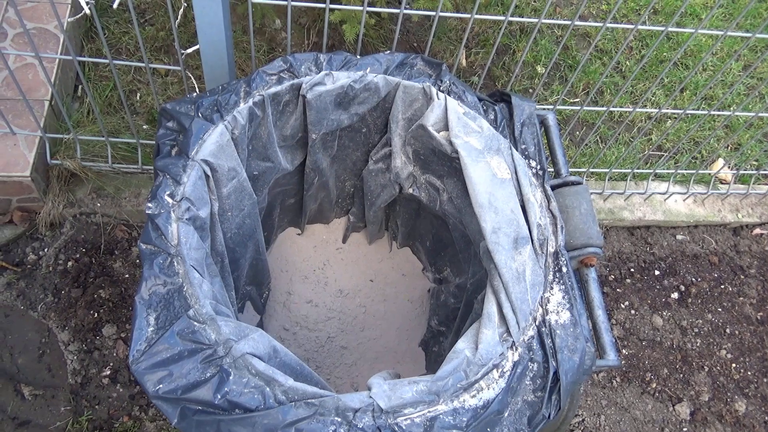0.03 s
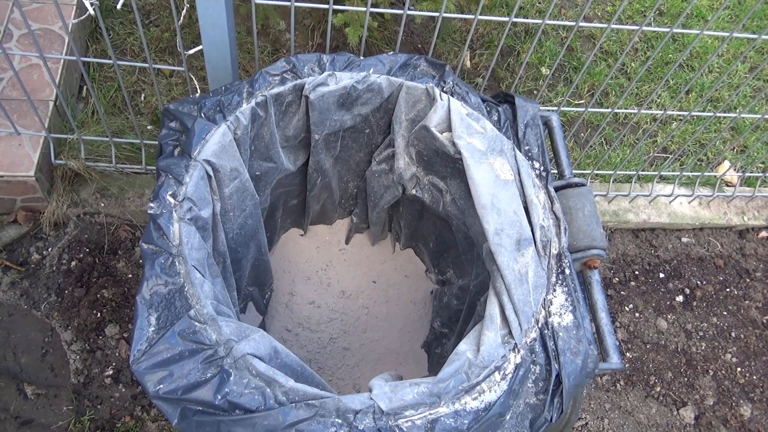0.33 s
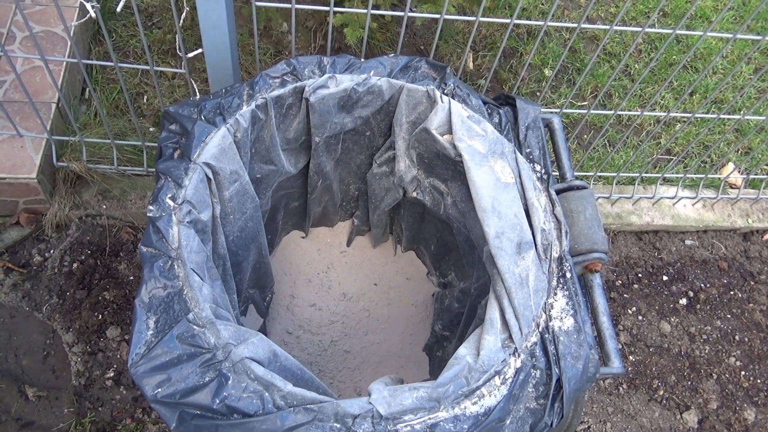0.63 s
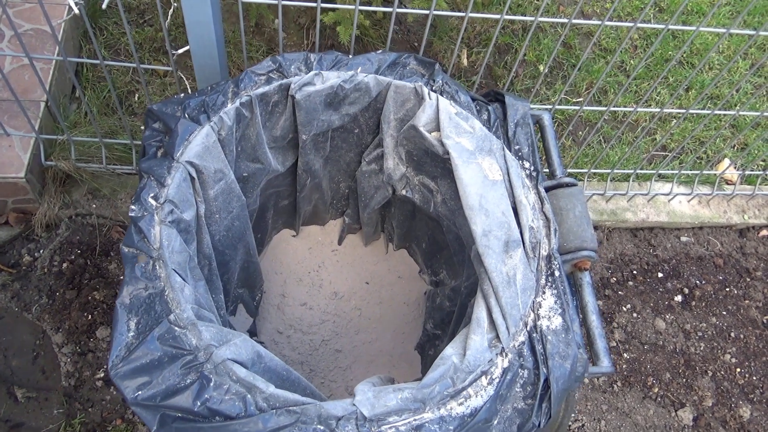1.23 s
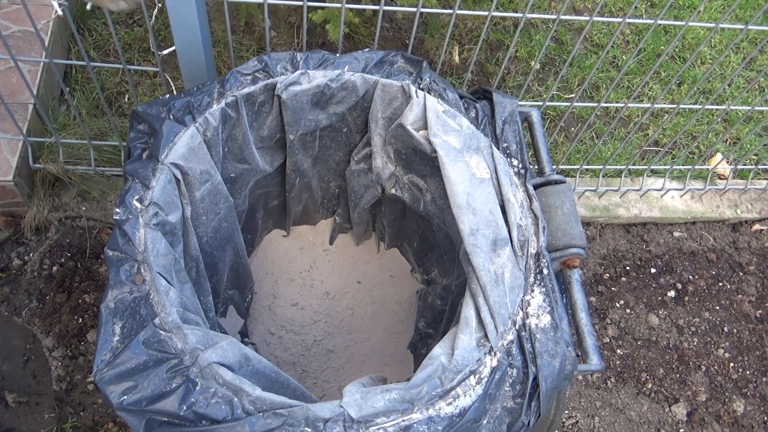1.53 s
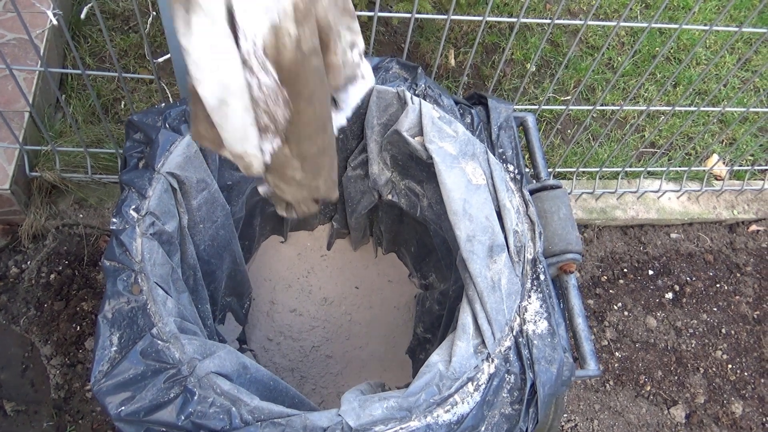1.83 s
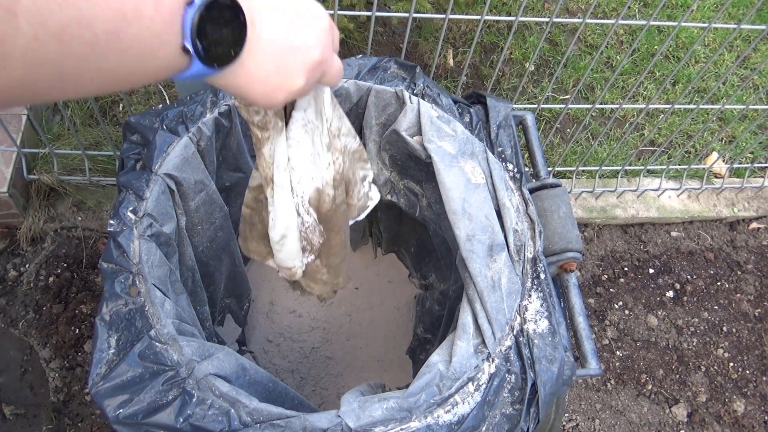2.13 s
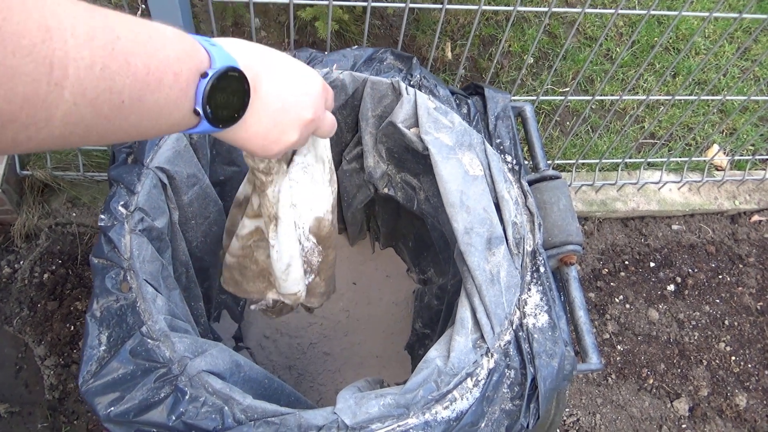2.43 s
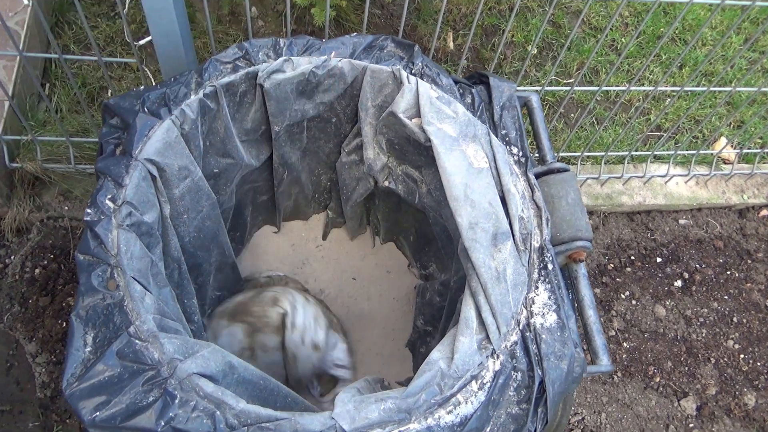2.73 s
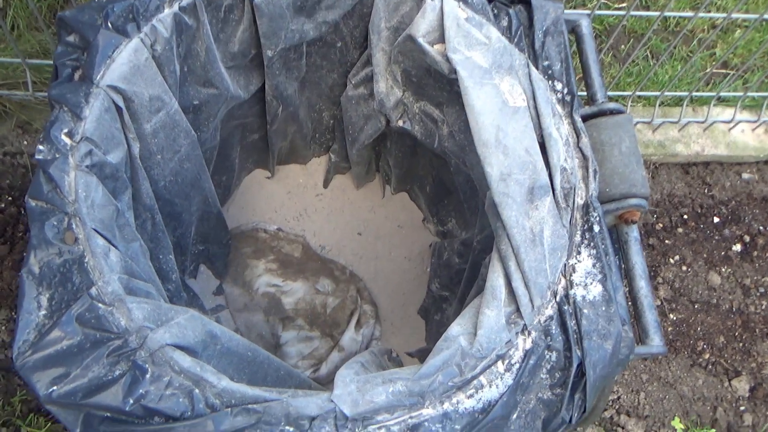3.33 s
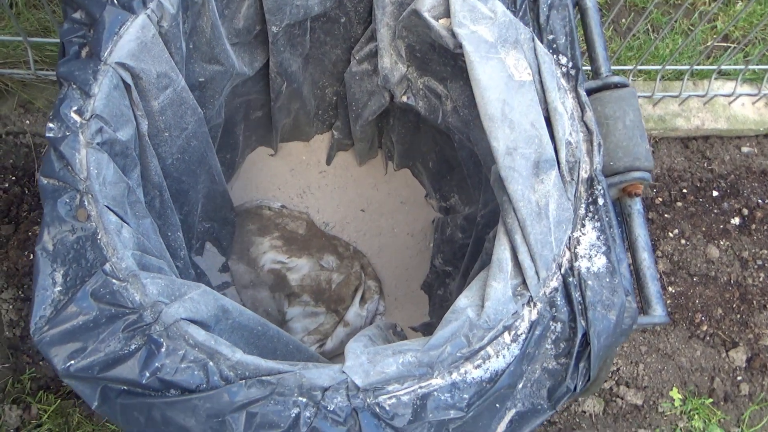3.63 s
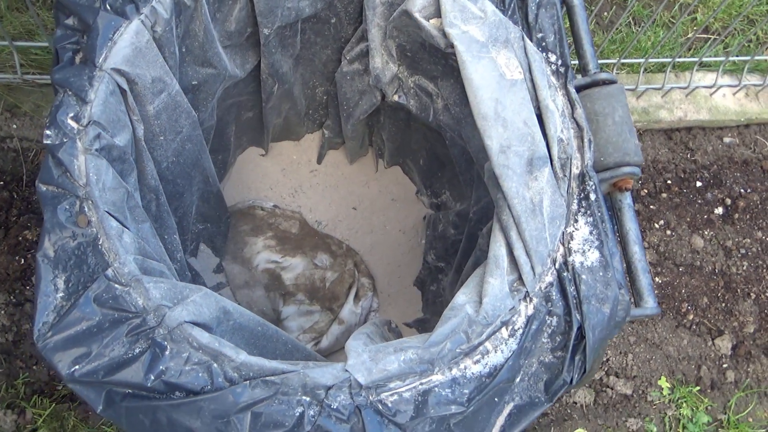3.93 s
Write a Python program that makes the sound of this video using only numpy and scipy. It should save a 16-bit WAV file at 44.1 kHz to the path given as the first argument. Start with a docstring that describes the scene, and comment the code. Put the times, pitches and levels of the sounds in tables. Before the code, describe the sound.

A wet cloth splats into muddy water as wind buffets the microphone.

```python
"""A wet cloth is carried to a lined bin outdoors, over faint background noise and a hum.
From the start, clothing swishes and the grip creaks, clicks and rasps close to the microphone.
Just before 1 s, gusts begin to buffet the microphone, and soon after a plastic part snaps.
At about 2.6 s the cloth drops into muddy water with one short splat of spray, slosh and trapped air.
The gusts, swishes and clicks carry on to the end."""
import sys
import numpy as np
from scipy import signal
from scipy.fft import rfft, irfft
from scipy.io import wavfile
from scipy.ndimage import uniform_filter1d

SR = 44100
rng = np.random.default_rng(int(sys.argv[2]) if len(sys.argv) > 2 else 0)


def output_pcm(signal):
    """Save a mono or channel-first signal as 16-bit PCM at the path in sys.argv[1].

    Samples are clipped to [-1, 1] before scaling.
    """
    pcm = np.clip(np.atleast_2d(signal).T, -1, 1) * 32767
    wavfile.write(sys.argv[1], SR, np.round(pcm).astype(np.int16))


N = 176400  # 4 seconds
T, FREQS = np.arange(N) / SR, np.fft.rfftfreq(N, 1 / SR)
# Likeness of left and right: 1 is the same, 0 is unrelated, -1 is opposite.
WATER_LIKENESS, GRIP_LIKENESS = 0.97, 0.87
CLICK_LEFT_DB = 4

# The tone of sloshing muddy water. Each row: frequency in Hz, level in dB.
SLOSH_TONE = [(200, -4), (500, 3.5), (900, 2), (1500, 3), (2500, -2.5), (4500, -3), (10000, -65)]
# The tone that clicks and rasps share. Each row: frequency in Hz, level in dB.
CLICK_TONE = [(250, -30), (900, 10), (3000, 4), (5000, 4), (7000, 1.5), (9500, 5.5), (12000, -6),
              (15500, -13)]


def amp(db):
    """Turns decibels into a number to multiply a sound by."""
    return 10 ** (np.asarray(db) / 20)


def unit(x):
    """Scales a sound so that its average power is 1."""
    return x / np.sqrt(np.mean(x ** 2) + 1e-20)


def steady(x, samples):
    """Evens out the loudness over the given number of samples."""
    power = uniform_filter1d((x ** 2).mean(0), size=samples)
    return x / np.sqrt(abs(power) + 1e-12)


def over_frequency(points):
    """Joins rows of frequency and value into a curve over all frequencies."""
    hz, value = np.transpose(points)
    return np.interp(np.log(FREQS + 1), np.log(hz), value)


def over_time(rows, column=1):
    """Joins rows of seconds and dB into a volume curve for the whole scene."""
    rows = np.array(rows)
    return amp(np.interp(T, rows[:, 0], rows[:, column]))


def add(mix, start, sound):
    """Mixes a stereo sound in at a start time in seconds."""
    part = mix[:, max(round(start * SR), 0):][:, :sound.shape[1]]
    part += sound[:, :part.shape[1]]


def pan(left_db):
    """Left and right volumes, with the left louder by left_db."""
    return amp([[left_db / 2], [-left_db / 2]])


def colour(x, tone):
    """Filters a sound to follow a tone table; white noise would keep its power."""
    log_gain = np.log(amp(over_frequency(tone)))
    # This phase makes the filter ring after each hit, not before it.
    phase = -signal.hilbert(np.r_[log_gain, log_gain[-2:0:-1]]).imag[:len(FREQS)]
    return irfft(rfft(x) * unit(np.exp(log_gain)) * np.exp(1j * phase), N)


def pair(x, likeness):
    """Blends two unrelated channels into a left and a right with the given likeness."""
    mid, side = rfft(x)
    likeness = np.clip(likeness, -1, 1)
    mid, side = mid * np.sqrt(1 + likeness), side * np.sqrt(1 - likeness)
    return irfft(np.array([mid + side, mid - side]), N)


def noise(tone, likeness):
    """Smooth stereo noise with the given tone."""
    return unit(colour(pair(rng.standard_normal((2, N)), likeness), tone))


def grains(per_second, spread_db, likeness):
    """Tiny random impacts in stereo, a few of them large."""
    size = amp(spread_db * np.minimum(rng.exponential(1, (2, N)), 4))
    sign = rng.choice([-1, 1], (2, N))
    hits = rng.random((2, N)) < per_second / SR
    return pair(size * sign * hits, likeness)


def crackle(tone, likeness, per_second, spread_db):
    """Tiny random impacts with the given tone."""
    return unit(colour(grains(per_second, spread_db, likeness), tone))


def flutter(swell_s=0.005, depth_db=1.5):
    """Quick uneven swelling, as cloth catches and lets go."""
    window = np.hanning(round(2 * swell_s * SR))
    wobble = signal.fftconvolve(rng.standard_normal(N), window, "same")
    return amp(depth_db * unit(wobble))


def outdoors(hum_hz=607, hum_width_hz=54, air_db=-47.5):
    """Steady distant noise, and a faint hum that swells and fades."""
    # The tone of the distant noise. Each row: frequency in Hz, level in dB.
    air_tone = [(20, -10), (50, 8), (120, -1), (300, -2.5), (480, -3), (620, -7.5), (800, -3), (1000, -4.5),
                (1400, -12.5), (2500, -20.5), (5000, -24), (9000, -24.5), (15500, -34)]
    # How alike it is on both sides. Each row: frequency in Hz, likeness.
    air_likeness = [(100, 0.97), (600, 1), (1200, 0.64), (3000, 0.18), (9000, 0.99)]
    # The swelling of the hum. Each row: time in seconds, level in dB.
    hum_levels = [(0, -86), (.3, -53), (.45, -58), (.485, -40), (.52, -54), (.68, -50.5), (.95, -52.5),
                  (1.6, -57.5), (4, -51.5)]
    hum = irfft(rfft(rng.standard_normal(N)) / (1 + ((FREQS - hum_hz) / hum_width_hz) ** 2), N)
    air = amp(air_db) * noise(air_tone, over_frequency(air_likeness))
    return air + over_time(hum_levels) * steady(hum[None], samples=900)


def clothing():
    """Strokes of fabric swell and fade, with crinkles in them and a high fizz in the fast ones."""
    # Strokes near the microphone. Each row: peak time, rise and fall in seconds, strength in dB,
    # fizz in dB compared with the stroke.
    strokes = [(.04, 0.028, 0.044, -61, 2), (.3, 0.1, 0.042, -48, -2), (.66, 0.15, 0.14, -49.5, -6),
               (.785, 0.063, 0.054, -46, 1.5), (.93, 0.11, 0.072, -46.5, -8),
               (1.19, 0.053, 0.055, -46.5, -20), (1.45, 0.17, 0.11, -54, -18), (2.14, 0.1, 0.085, -59, -20),
               (2.9, 0.079, 0.082, -59, -20), (3.17, 0.083, .13, -44, -2), (3.69, 0.072, 0.12, -45.5, 1),
               (3.95, 0.068, 0.17, -46, -5)]
    # The tones of rubbing, crinkling and fizzing fabric. Each row: frequency in Hz, level in dB.
    rub_tone = [(300, -9), (900, -5), (2000, -2), (3500, -3), (6500, -1.5), (10000, -5), (12000, -22),
                (15500, -43)]
    crinkle_tone = [(600, -35), (2500, -0.5), (5000, 8.5), (9500, 3), (12000, -7), (15500, -9)]
    fizz_tone = [(3000, -5), (7000, 5), (10000, 7.5), (13000, 2.5), (15500, -5.5)]
    # How alike the fabric sounds on both sides. Each row: frequency in Hz, likeness.
    fabric_likeness = [(800, 1), (2000, 0.26), (4000, 0.51), (7500, 0.33), (10000, 0.93), (15000, 1)]
    power, fizz_power = np.zeros((2, N))
    for peak, rise, fall, db, fizz_db in strokes:
        from_peak = np.maximum((peak - T) / rise, (T - peak) / fall)
        stroke = amp(db) * np.exp(-.5 * from_peak ** 1.52)
        power += stroke ** 2
        fizz_power += (amp(fizz_db) * stroke) ** 2
    likeness = over_frequency(fabric_likeness)
    crinkle = amp(-4) * crackle(crinkle_tone, likeness, per_second=230, spread_db=6)
    rub = amp(1) * noise(rub_tone, likeness)
    fizz = amp(-1.5) * noise(fizz_tone, likeness=1)
    return pan(left_db=2) * (np.sqrt(power) * (rub + crinkle) + np.sqrt(fizz_power) * fizz)


def grip_creak():
    """The grip creaks finely with a stream of tiny ticks."""
    # How strongly the grip creaks. Each row: time in seconds, level in dB.
    creak_levels = [(0, -54), (.12, -50.5), (.22, -43.5), (.36, -54.5), (.88, -50.5), (1.1, -58),
                    (1.18, -47), (1.3, -67), (1.8, -66.5), (2.03, -56.5), (2.13, -45.5), (2.3, -59),
                    (3.035, -59), (3.055, -46), (3.35, -43.5), (3.46, -46), (3.6, -45.5), (3.86, -49),
                    (4, -43.5)]
    # The tone of the creak. Each row: frequency in Hz, level in dB.
    creak_tone = [(250, -24.5), (600, 6), (1000, 7), (1600, 4), (2800, 0), (4500, -5.5), (9000, -23.5),
                  (15000, -47)]
    creak = crackle(creak_tone, GRIP_LIKENESS, per_second=2000, spread_db=3.5)
    return pan(left_db=8) * over_time(creak_levels) * creak


def clicks(slip_s=0.01, crack_s=0.0006, ring_s=0.003, echo_s=0.018):
    """A slip builds to a crack, rings briefly at its own pitch and bounces off nearby surfaces."""
    # Sharp clicks of handling and drips. Each row: time in seconds, strength in dB, pitch in Hz.
    click_events = [(0.031, -30.5, 5900), (0.061, -28, 5100), (.135, -34, 1300), (.235, -31, 1500),
                    (0.412, -32, 1600), (0.634, -28, 5700), (1.029, -34.5, 2000), (1.112, -36, 3970),
                    (1.1559, -13, 3400), (1.164, -22, 3200), (1.167, -27, 1110), (1.201, -28, 9000),
                    (1.385, -31, 6500), (1.427, -33.5, 6000), (1.462, -33, 6500), (1.480, -32.5, 4030),
                    (1.585, -37, 5100), (1.642, -31, 10500), (1.938, -36, 3000), (2.939, -28.5, 2730),
                    (3.077, -22.5, 5560), (3.146, -24.5, 10000), (3.385, -18, 4440), (3.519, -28, 2290),
                    (3.547, -26, 2530), (3.593, -24, 3320), (3.608, -26.5, 3500), (3.875, -29, 4000),
                    (3.955, -32, 4500), (3.973, -24.5, 3800)]
    t = np.arange(-SR // 100, SR // 10) / SR  # the crack comes at t = 0
    after = np.maximum(t, 0)
    slip_then_ring = np.where(t < 0, amp(-34) * np.exp(-abs(t) / slip_s),
                              amp(-12) * np.exp(-after / ring_s))
    echo_fade = amp(-14.5) * (t >= 0) * np.exp(-after / echo_s)
    out = np.zeros((2, N))
    for time, db, hz in click_events:
        hiss = rng.standard_normal((4, len(t)))
        centre_hiss, wide_hiss = hiss[1], hiss[2:]
        crack = hiss[0] * (t >= 0) * np.exp(-after / crack_s)
        crack *= np.sqrt(crack_s * SR / 8) / np.linalg.norm(crack)  # same energy each time
        ring = slip_then_ring * (centre_hiss + .5 * wide_hiss)
        click = crack + .5 * (ring + echo_fade * wide_hiss)
        b, a = signal.iirpeak(hz, Q=1.38, fs=SR)
        pitched = signal.lfilter(b, a, click) / np.sqrt(b[0])
        add(out, time + t[0], amp(db) * (pitched + amp(-2.5) * click))
    return amp(-1.5) * pan(CLICK_LEFT_DB) * colour(out, CLICK_TONE)


def rasps():
    """The grip or fabric drags: a dense run of tiny slips swells and dies within milliseconds."""
    # Short drags. Each row: start in seconds, rise in seconds, strength in dB, rough pitch in Hz.
    drags = [(0.1868, 0.00061, -33.5, 1600), (0.202, 0.0027, -41.5, 1610), (.220, 0.0035, -36.5, 1320),
             (1.154, 0.00066, -24.5, 5070), (1.348, 0.0034, -41, 3700), (2.328, 0.0067, -43, 6000),
             (3.046, 0.0027, -41, 1610), (3.257, 0.0022, -35.5, 8200), (3.2598, .002, -36, 2900),
             (3.392, 0.0042, -40, 4000), (3.4035, 0.0024, -32.5, 4930)]
    t = np.arange(SR // 20) / SR
    slips = grains(per_second=5400, spread_db=2, likeness=GRIP_LIKENESS)
    out = np.zeros((2, N))
    for start, rise, db, hz in drags:
        swell = t / rise * np.exp(1 - t / rise)
        run = swell * slips[:, round(start * SR):][:, :len(t)]
        rasp = signal.lfilter(*signal.iirpeak(hz, Q=1.27, fs=SR), run)
        add(out, start, amp(db) * unit(rasp) * np.sqrt(np.mean(swell ** 2)))
    return pan(left_db=6) * colour(out, CLICK_TONE)


def wind(strong_gust_db=-20):
    """Air swirls at the microphone's two openings; the rumble gets brighter as a gust grows."""
    # The strength of the gusts. Each row: time in seconds, level in dB.
    gust_levels = [(.87, -55.5), (.94, -26.5), (1.0, -40.5), (1.03, -26), (1.135, -20), (1.17, -30.5),
                   (1.215, -20), (1.26, -21), (1.305, -28.5), (1.335, -20.5), (1.43, -23.5), (1.59, -25.5),
                   (1.71, -41.5), (1.8, -32.5), (1.9, -27), (2.06, -25.5), (2.18, -32), (2.225, -49),
                   (2.32, -24.5), (2.38, -23), (2.47, -25), (2.66, -28), (2.72, -22.5), (2.85, -34.5),
                   (2.9, -21), (3.01, -31), (3.07, -27.5), (3.17, -37.5), (3.34, -17.5), (3.46, -32),
                   (3.59, -49.5), (3.68, -27), (3.74, -29), (3.78, -21.5), (3.88, -30.5), (4, -25.5)]
    # The tones of the rumble and of a strong gust's rush. Each row: frequency in Hz, level in dB.
    rumble_tone = [(15, -34), (30, -6.5), (70, -0.5), (130, 1), (230, -7.5), (350, -18), (600, -35),
                   (1200, -58), (3000, -105)]
    rush_tone = [(80, -27), (250, 7.5), (420, -8), (700, -14), (1200, -26.5), (2500, -54), (6000, -61)]
    # How alike the wind is at the two openings. Each row: frequency in Hz, likeness.
    wind_likeness = [(40, 0.81), (130, 0.61), (260, -0.13), (450, -0.42), (800, -1.1), (1600, -1)]
    likeness = over_frequency(wind_likeness)
    fade_in = np.clip((T - .8) / 0.034, 0, 1)
    gust = over_time(gust_levels) * fade_in
    rumble = amp(1) * gust * steady(noise(rumble_tone, likeness), samples=1500)
    rush = amp(-27) * (gust / amp(strong_gust_db)) ** 2.5 * noise(rush_tone, likeness)
    return rumble + rush


def buffets(bass_cut_hz=187):
    """Brief ragged bursts of wind hit the microphone during the gusts."""
    # Bursts of wind. Each row: peak time and half length in seconds, level in dB, treble cut in Hz.
    bursts = [(1.037, 0.0079, -22.5, 470), (1.085, 0.021, -21.5, 347), (1.228, 0.02, -15.5, 283),
              (1.273, 0.018, -22, 494), (1.379, 0.025, -23.5, 308), (2.063, 0.031, -34.5, 350),
              (2.371, 0.015, -27.5, 312), (2.519, 0.021, -21, 306), (2.718, 0.017, -30.5, 376),
              (2.907, 0.018, -29, 300), (3.061, 0.014, -27.5, 282), (3.333, 0.068, -23.5, 273),
              (3.337, 0.01, -25, 900), (3.692, 0.0065, -24.5, 400), (3.806, 0.016, -27, 380)]
    air = pair(rng.standard_normal((2, N)), likeness=-0.47)
    cut_bass = signal.butter(2, bass_cut_hz, "high", fs=SR, output="sos")
    out = np.zeros((2, N))
    for peak, half_length, db, hz in bursts:
        swell = np.exp(-((T - peak) / half_length) ** 2)
        dull_air = signal.sosfilt(signal.butter(3, hz, fs=SR, output="sos"), air)
        burst = swell * signal.sosfilt(cut_bass, dull_air)
        out += amp(db) * burst * np.sqrt(np.mean(swell ** 2) / np.mean(burst ** 2))
    return out


def snap(start_s=1.1553):
    """A stiff plastic part lets go at once and rings very briefly."""
    # The notes the plastic rings with. Each row: pitch in Hz, level in dB, fade time in seconds.
    notes = [(900, -27.5, 0.0034), (3120, -11.5, 0.0008), (5200, -20, 0.00059), (7800, -14, 0.00069)]
    t = np.maximum(T - start_s, 0)
    ring = sum(amp(db) * np.exp(-t / fade) * np.sin(2 * np.pi * hz * t) for hz, db, fade in notes)
    return pan(CLICK_LEFT_DB) * ring


def wind_thumps(lag_s=0.00029, width_cycles=0.5):
    """Large swirls of air thump one microphone opening just before the other."""
    # Single swirls. Each row: time in seconds, peak level in dB, pitch in Hz.
    swirls = [(1.218, -13.5, 190), (1.336, -23, 106), (2.372, -14.5, 163), (2.728, -12.5, 85),
              (2.901, -13.5, 90), (3.3416, -12, 880), (3.693, -14, 176)]
    t = np.arange(-SR // 50, SR // 50) / SR
    out = np.zeros((2, N))
    for (time, db, hz), side in zip(swirls, rng.choice([-1, 1], len(swirls))):
        cycles = (t + side * lag_s * np.array([[.5], [-.5]])) * hz
        swell = 1 / np.cosh(np.clip(cycles / width_cycles, -20, 20)) ** 2
        thump = swell * np.sin(2 * np.pi * cycles)
        add(out, time + t[0], amp(db) * thump / thump.max())
    return out


def splat():
    """The cloth hits the water: a bright burst of spray over a duller slosh."""
    # The first slap, the bulk of the cloth going in, then settling.
    # Each row: time in seconds, spray strength in dB, slosh strength in dB.
    splat_levels = [(2.638, -58, -66), (2.646, -40, -60), (2.666, -36, -38.5), (2.681, -33, -49),
                    (2.694, -31, -43.5), (2.727, -28, -38.5), (2.745, -31.5, -38.5), (2.759, -36.5, -38.5),
                    (2.775, -35, -50), (2.79, -40.5, -48), (2.84, -58, -56), (2.9, -55, -60)]
    # The tone of flying droplets. Each row: frequency in Hz, level in dB.
    spray_tone = [(500, -22), (1500, -16), (3300, -6.5), (4300, -2), (6000, -3), (8000, -1), (10000, -3.5),
                  (12000, -10), (15500, -25)]
    spray = amp(1) * crackle(spray_tone, WATER_LIKENESS, per_second=7000, spread_db=2)
    slosh = amp(3) * crackle(SLOSH_TONE, WATER_LIKENESS, per_second=2900, spread_db=2)
    spray *= over_time(splat_levels) * flutter()
    slosh *= over_time(splat_levels, column=2)
    fade_in_and_out = np.interp(T, [2.6, 2.63, 2.88, 2.98], [0, 1, 1, 0])
    return fade_in_and_out * (spray + slosh)


def fold_slaps(fade_s=0.0031, pitch_rise_per_s=15):
    """Each fold smacks the water and traps air, which rings at a rising pitch until mud damps it."""
    # Folds of cloth landing. Each row: start in seconds, level in dB, the air's first pitch in Hz.
    folds = [(2.644, -26, 330), (2.664, -34, 640), (2.691, -29, 440), (2.728, -35, 790), (2.757, -31, 885)]
    t = np.arange(SR // 25) / SR
    wash = noise(SLOSH_TONE, WATER_LIKENESS)
    out = np.zeros((2, N))
    for start, db, hz in folds:
        air_pocket = np.sin(2 * np.pi * hz * t * (1 + .5 * pitch_rise_per_s * t))
        smack = amp(-18) * wash[:, round(start * SR):][:, :len(t)]
        add(out, start, amp(db) * np.exp(-t / fade_s) * (air_pocket + smack))
    return out


def scene():
    """Adds up all the sounds at the microphone."""
    background = outdoors()
    handling = flutter() * (clothing() + grip_creak()) + clicks() + rasps() + snap()
    gusts = wind() + buffets() + wind_thumps()
    return background + handling + gusts + splat() + fold_slaps()


def record(dry):
    """The recorder cuts off the very highest treble."""
    cut_treble = signal.firwin(511, cutoff=15900, window=("kaiser", 9), fs=SR)
    return signal.oaconvolve(dry, cut_treble[None], "same")


dry = scene()
out = record(dry)
output_pcm(out)
```